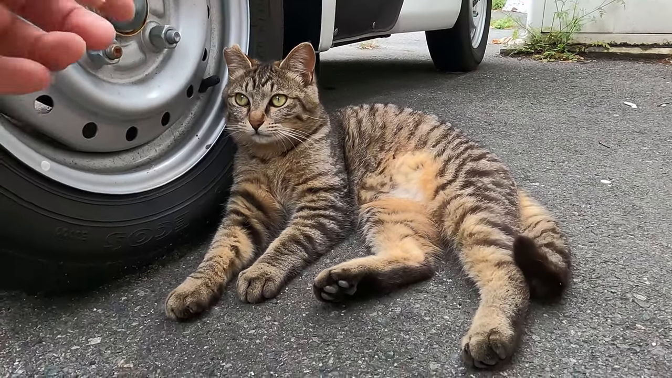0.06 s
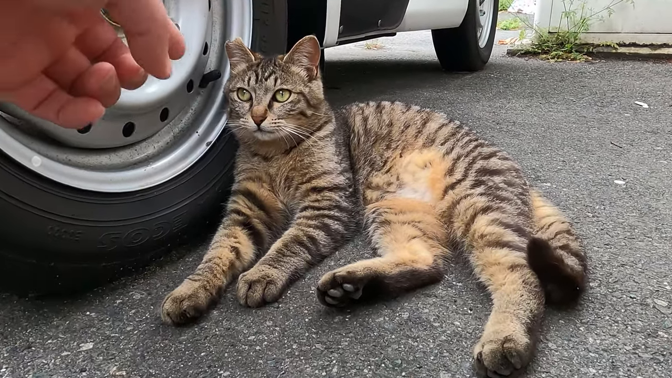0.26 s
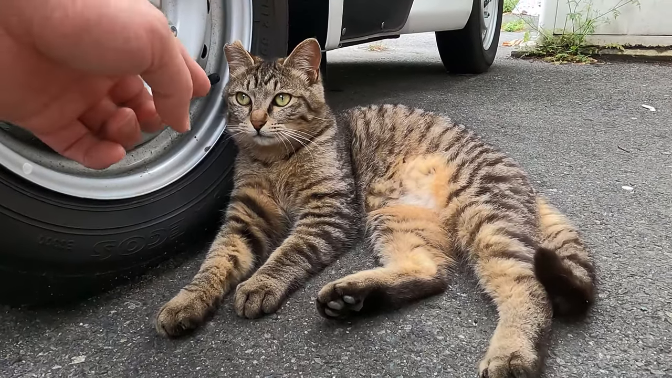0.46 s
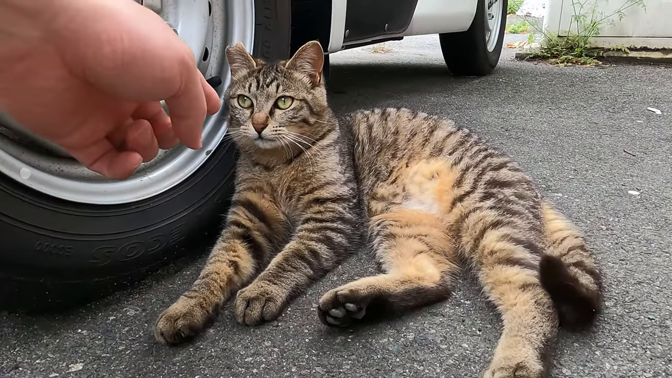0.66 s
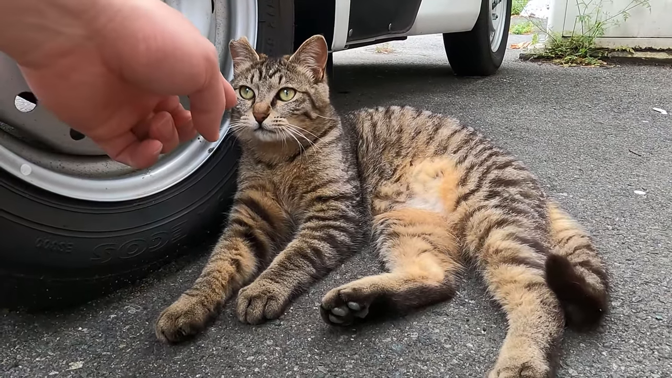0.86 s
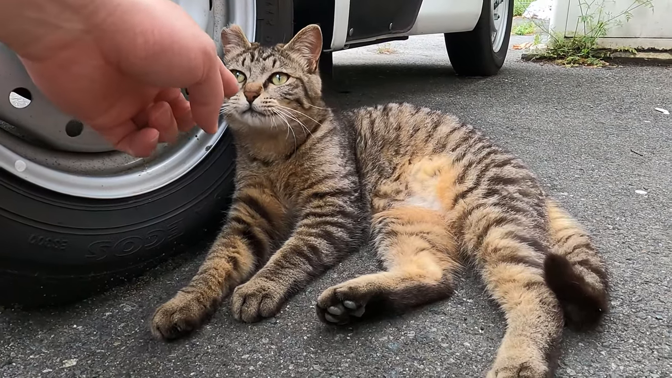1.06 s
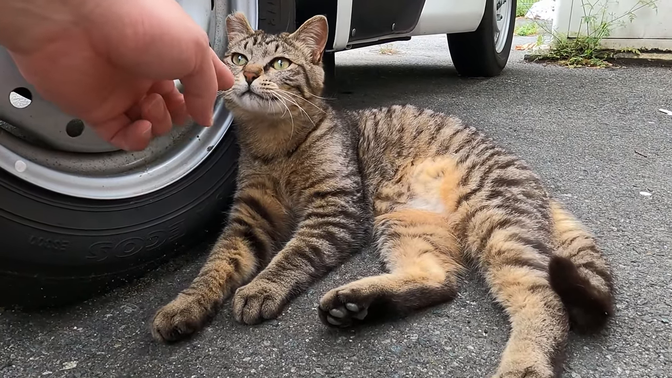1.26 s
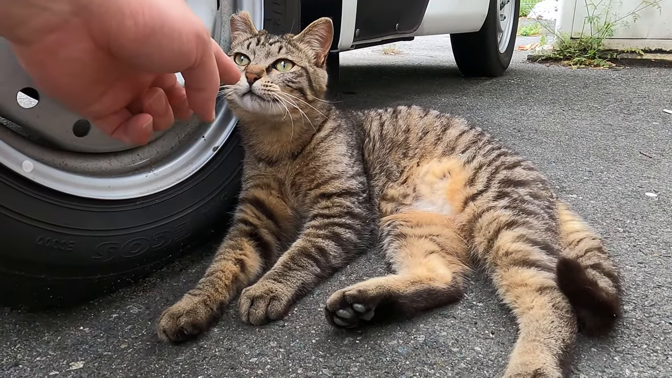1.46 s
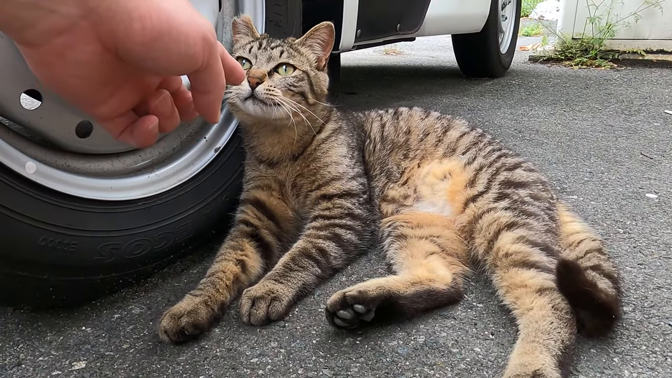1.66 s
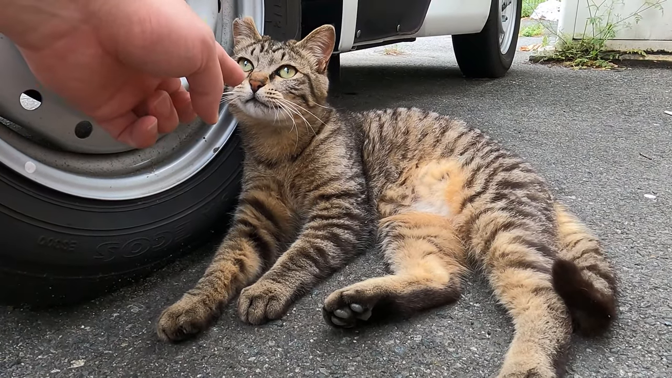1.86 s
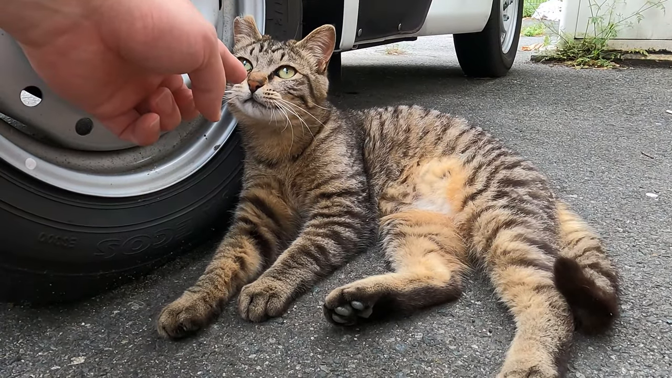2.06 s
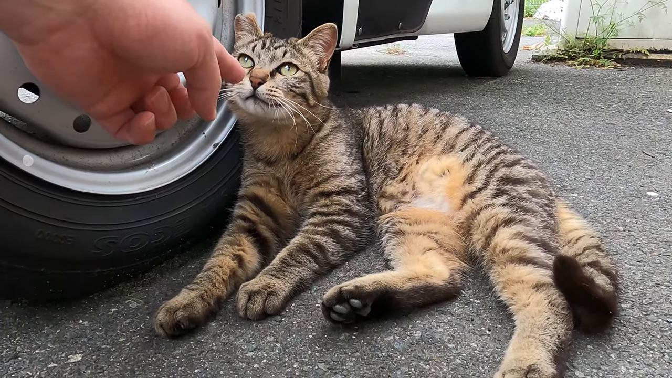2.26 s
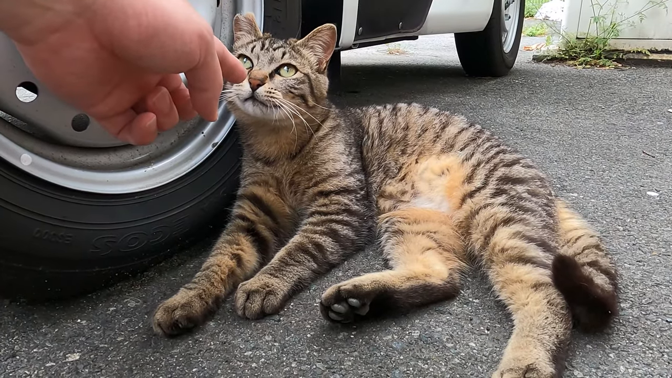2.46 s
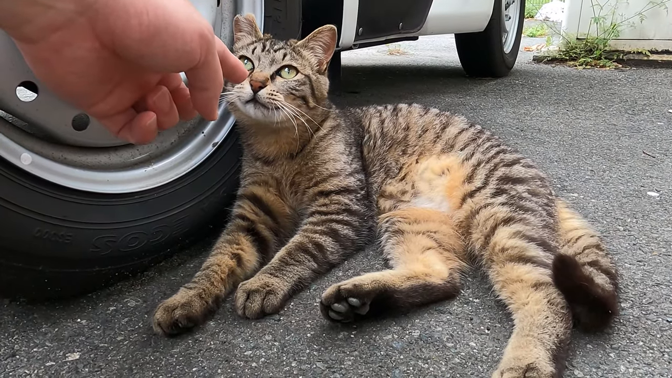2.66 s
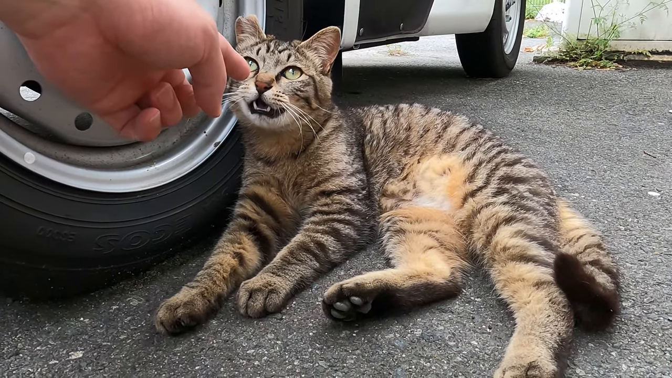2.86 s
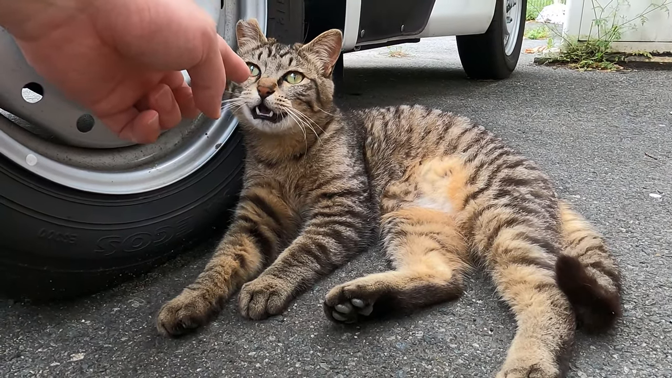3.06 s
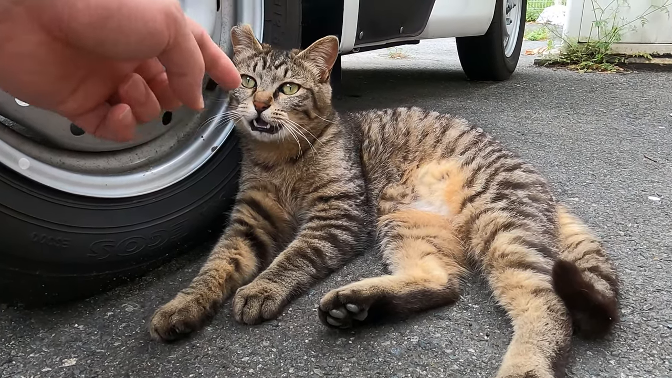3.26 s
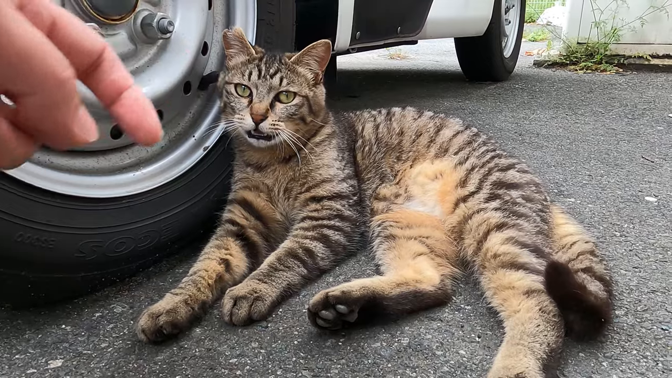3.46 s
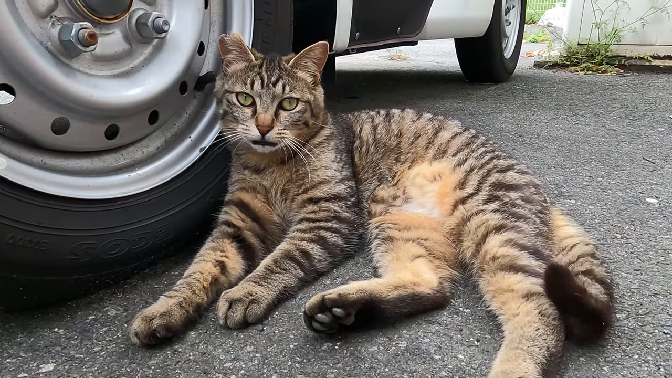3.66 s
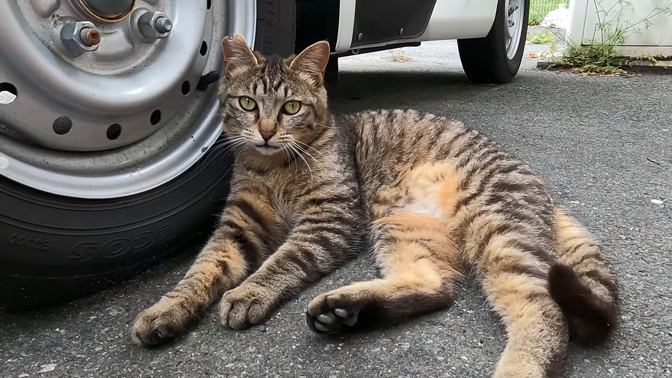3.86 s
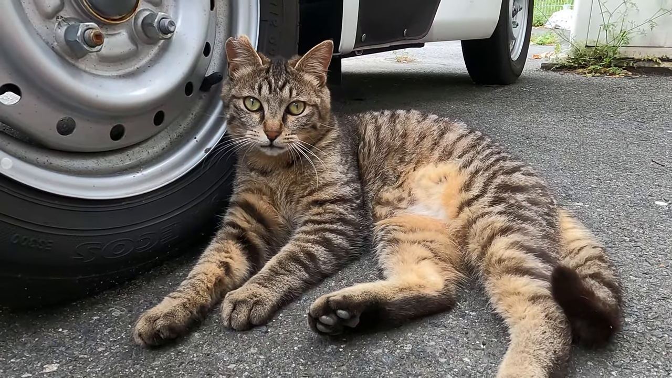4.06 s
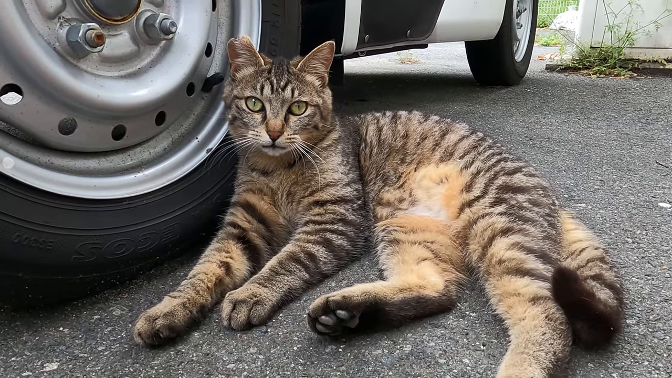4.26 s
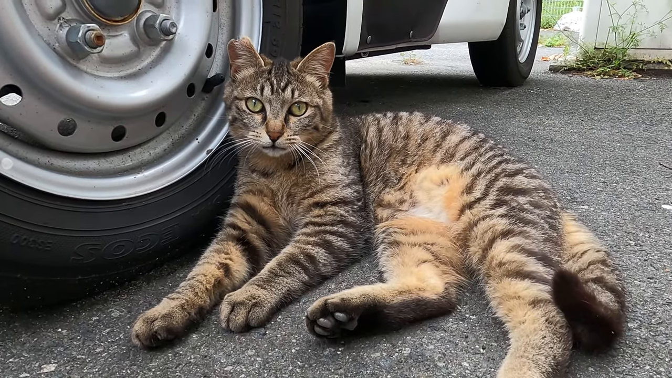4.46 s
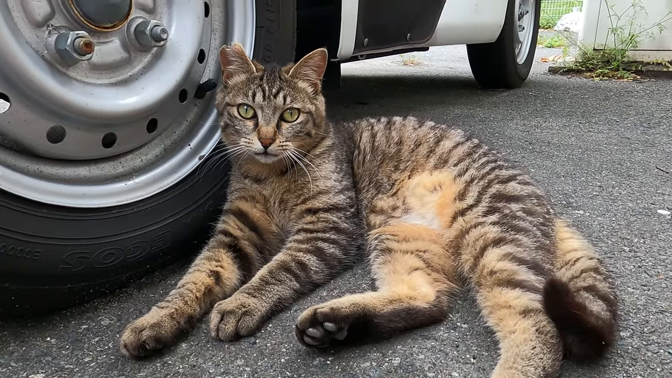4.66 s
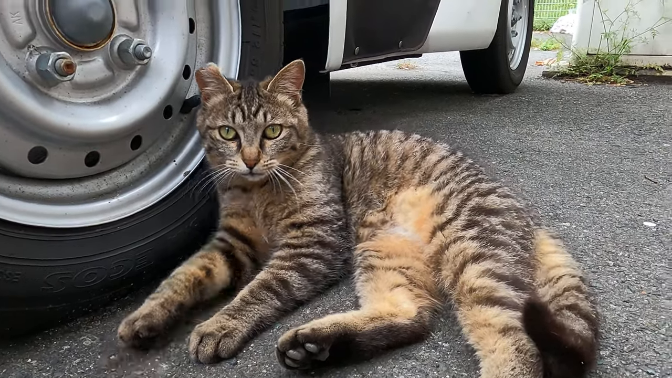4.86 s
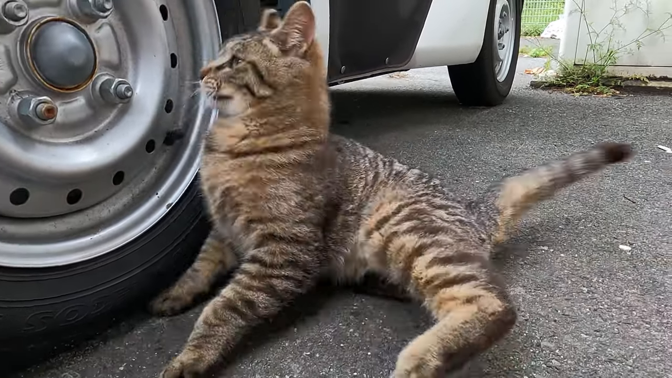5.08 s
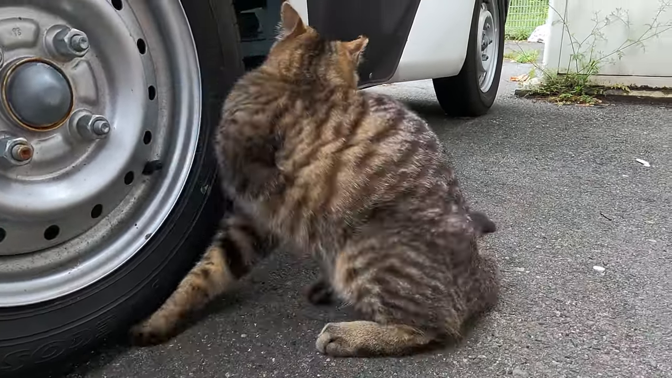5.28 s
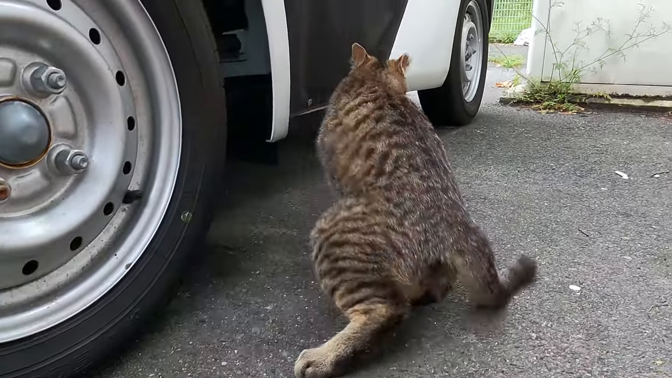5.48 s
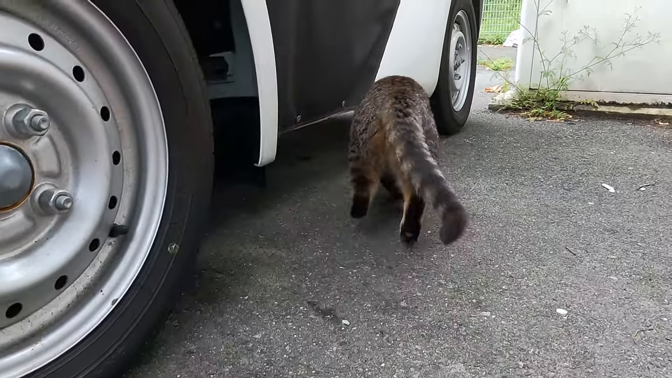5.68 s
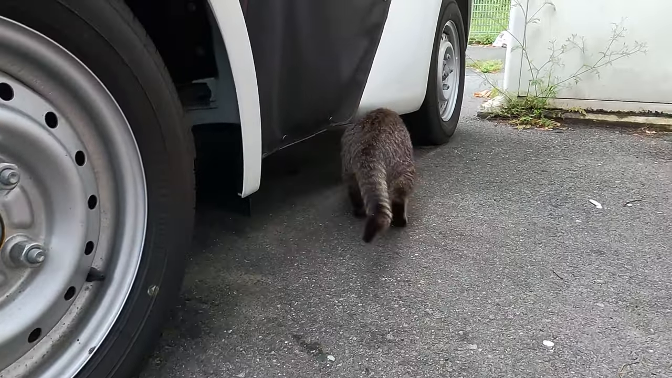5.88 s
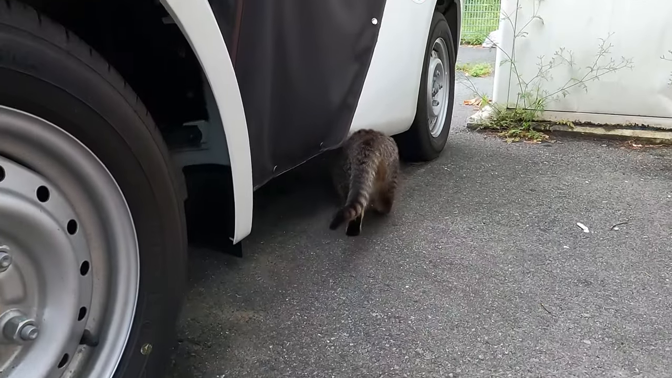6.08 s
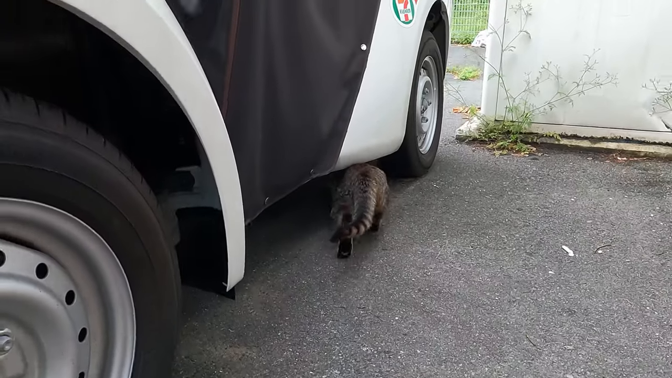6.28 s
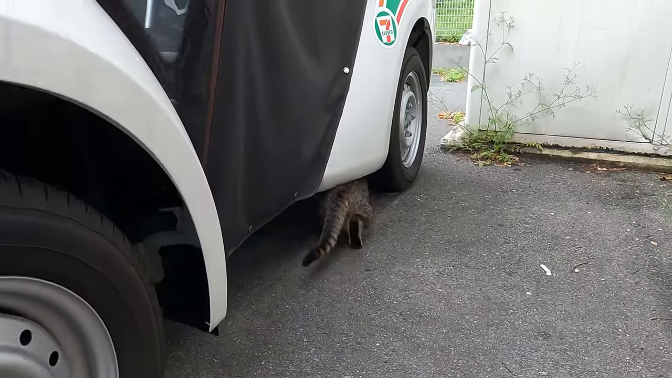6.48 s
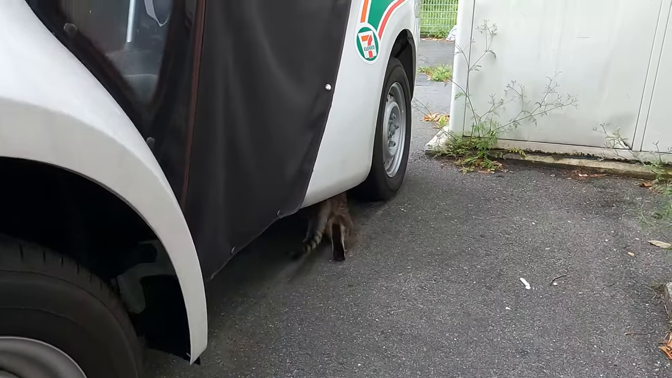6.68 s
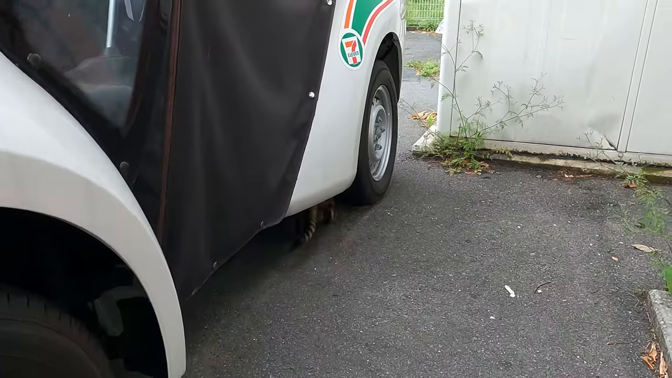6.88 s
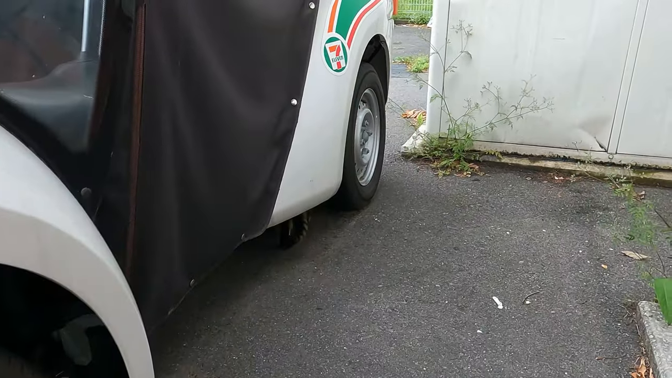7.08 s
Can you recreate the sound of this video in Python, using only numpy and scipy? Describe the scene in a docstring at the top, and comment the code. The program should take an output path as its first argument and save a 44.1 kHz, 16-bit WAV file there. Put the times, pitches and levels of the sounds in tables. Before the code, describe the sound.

From 0 s a low, dark murmur of far traffic drifts gently outdoors, with very faint hums and a barely audible high shimmer. Around 2 s there is a tiny soft puff of noise, and a weak low tone glides upward until about 2.6 s. At 2.8 s a nearby cat begins one loud meow: a slightly rasping, nasal onset, then a wide-open, bright, piercing cry, rising slightly and sagging in pitch, with a minute tick near 3.5 s. It closes into a short hum, slides down and breaks off at 3.8 s. The background, briefly ducked by the loud call, recovers. From about 4.3 s a distant engine drone emerges. Small dry ticks come at 5.0 to 5.3 s, with faint higher noise. From 6 s the vehicle is clearly nearer, with wavering low drone, engine-like tones, tyre roar and hiss swelling up to the end at 7.1 s.

```python
"""A cat on the asphalt of a parking lot gives one long meow: harmonics of its vocal folds through
nose, mouth and throat resonances. Far off, traffic murmurs throughout as slowly drifting coloured noise.
A vehicle draws nearer, with droning engine orders, tyre roar and hiss. Tones and narrow noise bands
(faint early, some loud and engine-like late), short noise puffs and a faint high hiss complete the place.
The recorder turns its gain down under the loud call."""
import sys
import numpy as np
from scipy import signal
from scipy.fft import rfft, irfft
from scipy.io import wavfile

SR = 44100
rng = np.random.default_rng(int(sys.argv[2]) if len(sys.argv) > 2 else 0)


def wav_out(sig):
    """Save sig, one row per channel (or a flat mono array), as 16-bit PCM at SR to the path in sys.argv[1]."""
    wavfile.write(sys.argv[1], SR, np.round(np.clip(np.atleast_2d(sig).T, -1, 1) * 32767).astype(np.int16))


N = 314433
T = np.arange(N) / SR   # time, s

CALL_S = (2.828, 3.81)      # the folds start and stop, s
CLOSING_S = (3.71, 3.79)    # the mouth shuts and the call ends as a hum, s


def amp(db):
    """dB to gain."""
    return 10 ** (np.asarray(db) / 20)


def rms_one(x):
    """Scale to rms 1."""
    return x / np.sqrt(np.mean(x ** 2) + 1e-20)


def in_time(rows, t=T):
    """Columns of a table whose first is t/s, read at times t."""
    s, *columns = np.transpose(rows)
    return [np.interp(t, s, c) for c in columns]


def ramp(t, span, values=(0, 1)):
    """Move evenly from one value to the other within the span."""
    return np.interp(t, span, values)


def coloured(spectrum):
    """Noise with the given shape in dB per Hz, read along log frequency; rms 1."""
    hz = np.maximum(np.fft.rfftfreq(N, 1 / SR), 1)
    points = np.array(spectrum)
    shape = amp(np.interp(np.log(hz), np.log(points[:, 0]), points[:, 1]))
    return rms_one(irfft(rfft(rng.standard_normal(N)) * shape, N))


def band(low_hz, high_hz):
    """Band-passed noise; rms 1."""
    sos = signal.butter(4, [low_hz, high_hz], "band", fs=SR, output="sos")
    return rms_one(signal.sosfilt(sos, rng.standard_normal(N)))


def drift(rate_hz, size=N):
    """Chance variation up to the given rate; spread 1, filter start-up discarded."""
    sos = signal.butter(2, rate_hz, fs=SR, output="sos")
    return rms_one(signal.sosfilt(sos, rng.standard_normal(size + SR // 2))[SR // 2:])


def resonance(hz, centre_hz, width_hz):
    """Complex response of one resonance, phase included, gain 1 at its centre."""
    return centre_hz * width_hz / (centre_hz ** 2 - hz ** 2 + 1j * hz * width_hz)


def traffic():
    """Far traffic: many sources merged into coloured noise whose level drifts."""
    # spectrum of the far murmur: f/Hz, level/dB per Hz (relative)
    murmur_spectrum = [(18, -50.5), (30, -24), (113, -2.5), (176, -5), (213, -6.5), (288, -3), (347, -9),
                       (459, -7.5), (515, -12), (553, -11), (1110, -20.5), (1220, -17.5), (1950, -21),
                       (4100, -26), (7880, -42), (10200, -76), (17300, -120)]
    # mean course of the murmur: t/s, level/dB
    murmur_level = [(0, -34.5), (3.3, -33), (3.8, -36), (4.5, -32.5), (5.5, -31.5), (7.13, -32.5)]
    level_db = in_time(murmur_level)[0] + .5 * drift(4.0)
    return amp(level_db) * coloured(murmur_spectrum)


def high_hiss():
    """Faint shimmer: a band of high noise whose level flickers."""
    # mean course of the shimmer: t/s, level/dB
    shimmer_level = [(0, -69.5), (.8, -70), (1.5, -73.5), (3.5, -78), (4.3, -73), (5.5, -69.5), (7.13, -72)]
    level_db = in_time(shimmer_level)[0] + 2.0 * drift(11)
    return amp(level_db) * band(9660, 11900)


def tones():
    """Tones and narrow noise bands on gliding centres, faint early, some loud and engine-like late."""
    # each tone or band: start t/s, end t/s, start f/Hz, end f/Hz, noise spread to either side/Hz, level/dB
    glides = [(0, 3.0, 287, 287, 6, -50.5), (0, 2.6, 550, 550, 12, -50), (1.25, 1.85, 3980, 3980, 10, -56),
              (2.15, 2.6, 234, 267, 3, -36), (2.6, 5.9, 288, 280, 8, -41.5),
              (5.15, 6.7, 7150, 7150, 300, -65), (5.2, 6.5, 3450, 3450, 200, -51.5),
              (6.1, 6.4, 403, 402, 4, -32.5), (6.2, 7.0, 332, 333, 6, -43), (6.3, 6.78, 236, 232, 5, -30),
              (6.6, 7.2, 705, 715, 40, -38), (6.78, 7.2, 1350, 1400, 150, -41)]
    out = np.zeros(N)
    for start, end, from_hz, to_hz, width_hz, db in glides:
        span = slice(int(start * SR), int(end * SR))
        t = T[span]
        phase = 2 * np.pi * np.cumsum(ramp(t, (start, end), (from_hz, to_hz))) / SR
        fade = np.clip(np.minimum(t - start, end - t) / (.1 * (end - start)), 0, 1)
        noisy = min(width_hz / 25, 1)      # wide ones are all noise, narrow ones nearly a tone
        steady = np.sqrt(2 - 2 * noisy ** 2)
        noise = drift(width_hz, size=len(t)) + 1j * drift(width_hz, size=len(t))
        out[span] += amp(db) * fade * np.real((steady + noisy * noise) * np.exp(1j * phase))
    return out


def vehicle():
    """Engine orders that waver on their own, with tyre roar and hiss; it fades in from afar."""
    # nearing vehicle, ahead of the arrival fade: t/s, engine firing line level/dB, tyre roar level/dB
    approach = [(3.9, -58, -31), (4.35, -45, -34.5), (4.6, -40.5, -36.5), (4.8, -42.5, -36),
                (5.5, -40.5, -32.5), (5.85, -42.5, -32), (6.25, -35.5, -27.5), (6.9, -35, -35.5),
                (7.12, -37, -26.5)]
    # engine firing rate: t/s, f/Hz
    firing = [(4.3, 64.5), (4.9, 62.2), (5.3, 62.7), (6.25, 61.6), (6.55, 58.0), (7.13, 58.8)]
    # engine orders: multiple of the firing rate, mean level/dB on top of the engine level
    orders = [(1, 0), (2, -4), (3, -3.5), (4, -5), (4.5, -3.5), (5, -18), (5.5, -11), (6, -12.5),
              (6.5, -3.5), (9, -10.5)]
    # spectrum of the tyres on the road: f/Hz, level/dB per Hz (relative)
    tyre_spectrum = [(47, -24), (80, -8.5), (176, 0.5), (217, 1), (263, 9), (459, -6.5), (701, -3),
                     (935, -5.5), (2090, -6), (3450, -14.5), (7880, -83), (10200, -60), (17300, -120)]
    hiss_at_hold_db = -38.5
    growth_db_per_s, hold_s = 6.5, 5.9                   # tyre hiss grows up to this time, then holds
    last_swell_db_per_s, last_swell_s = 22.5, 6.754      # and swells again at the end

    engine_db, roar_db = in_time(approach)
    growth_db = growth_db_per_s * np.minimum(T - hold_s, 0)
    growth_db = growth_db + last_swell_db_per_s * np.maximum(T - last_swell_s, 0)

    phase = 2 * np.pi * np.cumsum(in_time(firing)[0]) / SR
    engine = np.zeros(N)
    for k, db in orders:
        waver_db = min(0.44 * k, 4.0) * drift(2.2)      # higher orders waver more
        engine += amp(db + waver_db) * np.sin(k * phase + rng.uniform(0, 2 * np.pi))

    tyres = coloured(tyre_spectrum)
    upper = signal.sosfilt(signal.butter(2, 600, "high", fs=SR, output="sos"), tyres)
    roar = tyres - upper
    hiss = rms_one(upper) + amp(-12.5 + 0.32 * growth_db) * band(1900, 5500)      # nearer is brighter

    arrival = np.clip((T - 3.5) / 1.1, 0, 1)
    sound = np.sqrt(2) * amp(engine_db) * engine + amp(roar_db) * roar
    return arrival * (sound + amp(hiss_at_hold_db + growth_db) * hiss)


def noise_puffs():
    """Short puffs of band noise that swell and die smoothly.

    One is a tick as the recorder overloads at the loud call (3.461 s),
    one a narrow flick of the voice as the call ends (3.78 s)."""
    # puffs: centre t/s, length/s, low f/Hz, high f/Hz, level at the peak/dB
    puffs = [(2.04, .05, 3000, 6500, -49), (2.045, .05, 8000, 12800, -66), (3.461, .001, 5000, 13500, -39),
             (3.78, .007, 2450, 2950, -32), (5.037, .004, 900, 3600, -31), (5.051, .012, 700, 2800, -31),
             (5.16, .004, 4000, 7200, -41), (5.335, .015, 3000, 4500, -43)]
    out = np.zeros(N)
    for s, length, low_hz, high_hz, db in puffs:
        puff = np.exp(-((T - s) / length * 2) ** 2)
        out += amp(db) * puff * band(low_hz, high_hz)
    return out


def fold_pitch(t):
    """Fold rate in Hz: an arch that sags, a sharp start, a slide and a downward break at the end."""
    # held pitch, ahead of the onset, slide and break: t/s, f/Hz
    arch = [(2.856, 538), (2.9, 560), (2.95, 571), (3.02, 578.5), (3.1, 581), (3.24, 575), (3.33, 568),
            (3.49, 550.5), (3.57, 545.5), (3.73, 536)]
    onset_sharp_hz, onset_s = 200, .028                  # the folds start this much too high and settle
    let_go_s, let_go_hz_per_s = 3.733, 950               # the pitch slides as the breath runs out
    break_s, break_hz, break_hz_per_s = 3.777, 35, 1000  # then the voice breaks and slides faster
    sharp = onset_sharp_hz * np.clip(1 - (t - CALL_S[0]) / onset_s, 0, 1) ** 1.3
    slide = let_go_hz_per_s * np.maximum(t - let_go_s, 0)
    broken = ramp(t, (break_s - .002, break_s + .003), (0, break_hz))
    broken = broken + break_hz_per_s * np.maximum(t - break_s, 0)
    return in_time(arch, t)[0] + sharp - slide - broken


def rasp(t):
    """Roughness of the folds: most at the start, flickering, with brief catches."""
    # the voice catches for an instant, the clearest times: t/s, extra roughness (0-1)
    clear_catches = [(2.893, .07), (2.97, .05), (2.987, .03), (3.055, .025), (3.09, .035), (3.15, .03),
                     (3.186, .04), (3.263, .025), (3.46, .04), (3.78, .2)]
    # smaller catches come at random while the call is loud
    catches_per_s, catch_rasp, catching_s = 18, .025, (2.95, 3.7)
    onset = .1 * np.exp(-(t - CALL_S[0]) / .055)
    rough = .029 + onset + .01 * ramp(t, CLOSING_S)      # held, start, extra when shut
    rough = np.abs(rough) * amp(1.5 * drift(30, size=len(t)))
    chance = rng.uniform(*catching_s, int(catches_per_s * np.ptp(catching_s)))
    for s, extra in clear_catches + [(s, catch_rasp) for s in chance]:
        rough = rough + extra * np.exp(-((t - s) / .003) ** 2)
    return rough


def meow():
    """The cat: harmonics of the fold pulses, shaped by nose, mouth and throat resonances."""
    # effort and jaw: t/s, nose level/dB, mouth level/dB, throat level/dB,
    # first mouth resonance f/Hz, second mouth resonance f/Hz
    tract = [(2.828, -44, -55, -90, 2090, 2720), (2.838, -25, -26, -71, 2180, 2800),
             (2.856, -28.5, -24.5, -39, 1690, 2500), (2.885, -29.5, -20.5, -34, 1600, 2410),
             (2.93, -32.5, -13.5, -30.5, 1840, 2620), (2.98, -35.5, -9, -31.5, 2210, 2740),
             (3.11, -33.5, -10.5, -32.5, 2253, 3174), (3.24, -29.5, -5, -32, 2230, 3030),
             (3.34, -24.5, -6, -27, 2246, 3080), (3.49, -26, -3.5, -30.5, 2334, 2910),
             (3.6, -28, -7, -38, 2270, 2670), (3.64, -29, -14, -40, 2254, 2850),
             (3.735, -25, -20, -50, 2275, 2700), (3.772, -23, -36, -85, 2247, 2625),
             (3.783, -21, -44, -85, 2130, 2600), (3.796, -23, -55, -89, 2150, 2640),
             (3.81, -66, -82, -92, 2150, 2600)]
    start, stop = int(CALL_S[0] * SR), int(CALL_S[1] * SR)
    t = T[start:stop]
    nose_db, mouth_db, throat_db, first, second = in_time(tract, t)

    rounding_s = (3.18, 3.83)      # the lips round steadily between these times
    first_width = ramp(t, rounding_s, (433, 140))
    fourth_db = ramp(t, rounding_s, (-13, 2.5))      # against the throat level
    third = ramp(t, rounding_s, (5270, 5570))
    third = third - 400 * np.exp(-(t - t[0]) / 0.19)      # it climbs into place as the jaw opens
    fourth = ramp(t, (3.15, 3.33), (6900, 6110))      # it steps down mid-call
    second_width_hz, third_width_hz, fourth_width_hz = 416, 700, 800
    # side pocket, at a nearly constant level below the mouth
    pocket_hz, pocket_width_hz = 4150, 900
    pocket_db = -34.5 - 0.0017 * (second - 2730)
    # nose resonance, from mouth open to mouth shut
    nose_hz, nose_width = ramp(t, CLOSING_S, (1010, 440)), ramp(t, CLOSING_S, (770, 120))
    throat_rasp = 4.5      # the throat resonances carry this many times more air noise
    top_edge = 1.09        # overtones fall steeply above this multiple of the fourth resonance

    rough = rasp(t)
    pitch = fold_pitch(t) * (1 + .0025 * drift(25, size=len(t)))      # the pitch wobbles a little
    phase = 2 * np.pi * np.cumsum(pitch) / SR
    phase = phase + .6 * rough * drift(250, size=len(t))      # fold jitter, rad at full roughness

    voice = np.zeros(len(t))
    for k in range(1, 15):
        hz = k * pitch
        nose = amp(nose_db) * resonance(hz, nose_hz, nose_width) / (1 + (hz / nose_hz / 3.2) ** 4)

        pair = resonance(hz, first, first_width) * resonance(hz, second, second_width_hz)
        between = abs(resonance(first, second, second_width_hz))      # the first peak stands at gain 1
        mouth = amp(mouth_db) * pair / between * (hz / first) ** 0.7

        third_peak = resonance(hz, third, third_width_hz) ** 2
        fourth_peak = amp(fourth_db) * resonance(hz, fourth, fourth_width_hz) ** 2
        pocket = amp(mouth_db + pocket_db) * resonance(hz, pocket_hz, pocket_width_hz) ** 2
        throat = amp(throat_db) * (third_peak + fourth_peak) + pocket

        # air noise around each line
        air = rough * (drift(130, size=len(t)) + 1j * drift(210, size=len(t)))
        low = (nose + mouth / (1 + (hz / 3500) ** 24.0)) * (1 + air)
        high = throat / (1 + (hz / (top_edge * fourth)) ** 16) * (1 + throat_rasp * air)
        high = high * amp(1.9 * drift(25, size=len(t)))      # overtones flutter
        voice -= np.real((low + high) * np.exp(1j * k * phase))

    out = np.zeros(N)
    out[start:stop] = np.sqrt(2) * voice * amp(.25 * drift(40, size=len(t)))      # the effort trembles
    return out


def scene():
    """Background, vehicle, noise puffs and cat, summed at one microphone."""
    background = traffic() + high_hiss() + tones()
    return (background + vehicle() + noise_puffs() + meow())[None]


def record(dry):
    """The recorder: a limiter holds peaks down and lets go slowly; the top is cut."""
    limit_db, release_db_per_s, attack_s = -1, 30.5, 0.012
    over = np.maximum(20 * np.log10(abs(dry[0]) + 1e-9) - limit_db, 0)
    # each peak's gain reduction falls evenly until a stronger one takes over
    held = np.maximum.accumulate(over + release_db_per_s * T) - release_db_per_s * T
    r = np.exp(-1 / (attack_s * SR))
    smooth = signal.lfilter([1 - r], [1, -r], held)
    ahead = np.roll(smooth, -int(2 * attack_s * SR))      # it looks a little ahead
    x = np.clip(dry * amp(-ahead), -1, 1)
    # 40 dB down from 13.7 kHz up
    return signal.sosfilt(signal.cheby2(12, 40, 13700, fs=SR, output="sos"), x)


dry = scene()
out = record(dry)
wav_out(out)
```